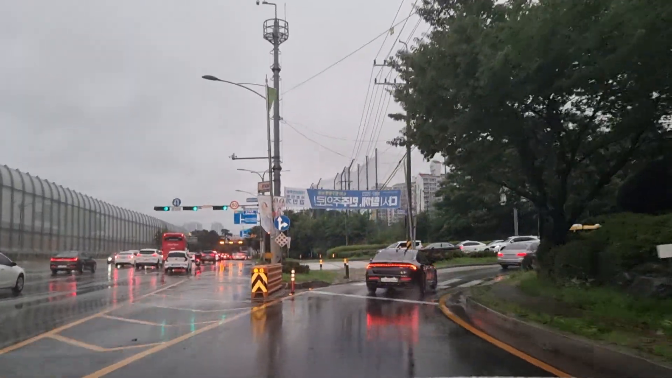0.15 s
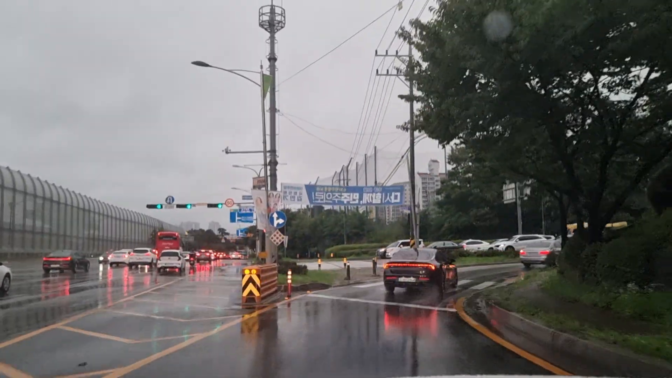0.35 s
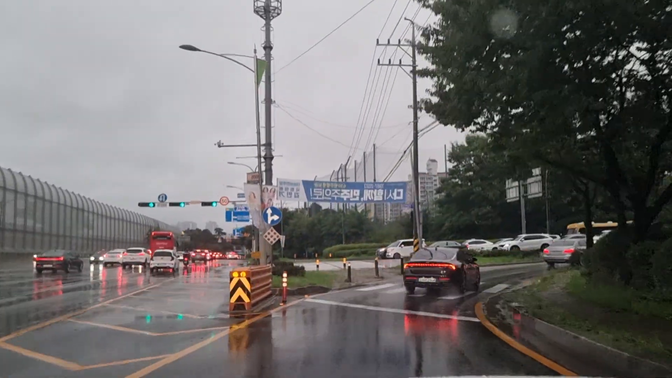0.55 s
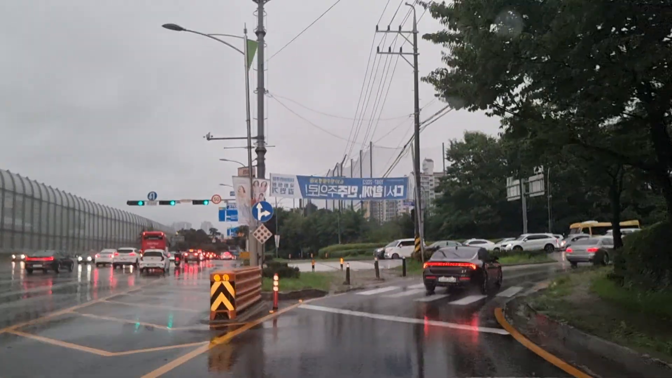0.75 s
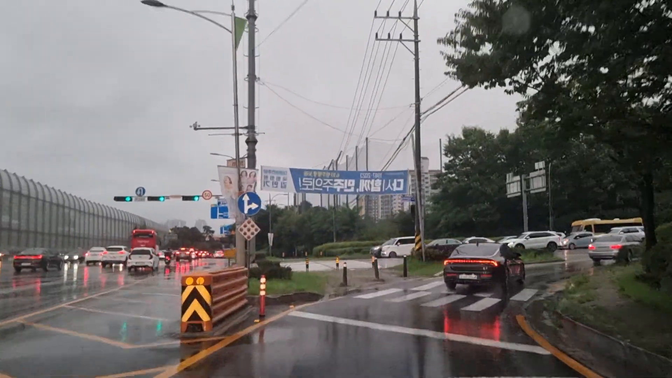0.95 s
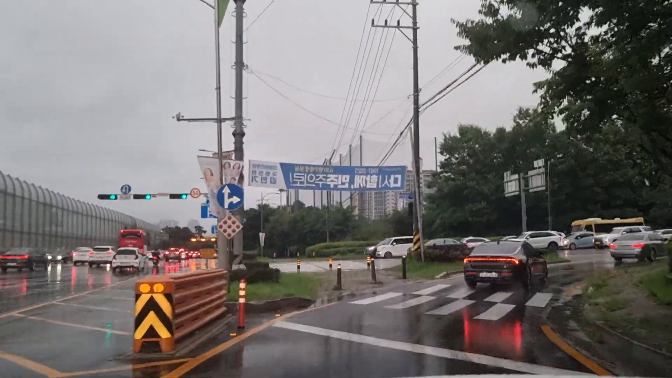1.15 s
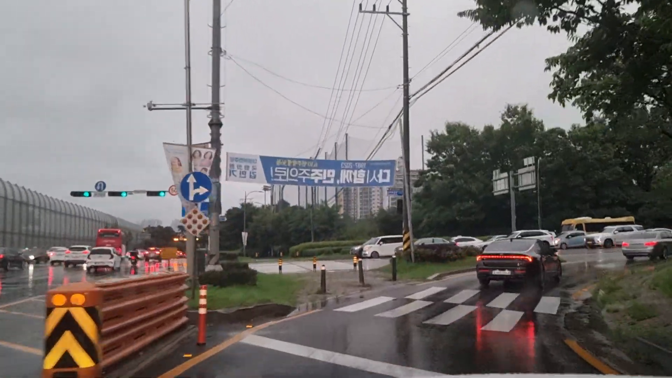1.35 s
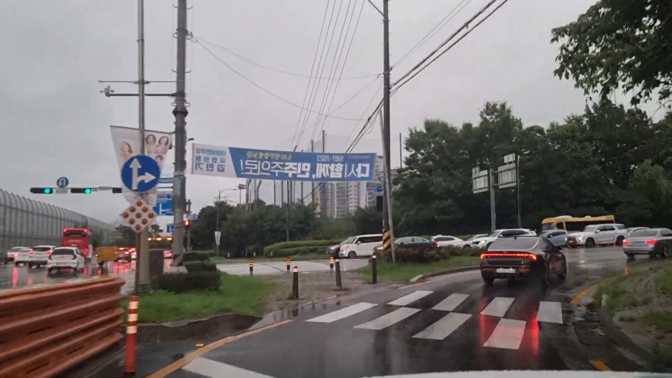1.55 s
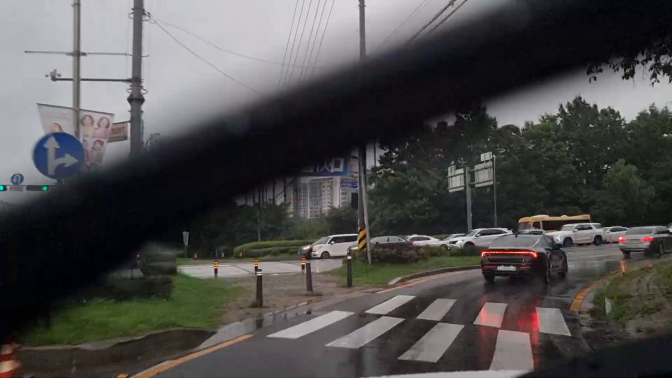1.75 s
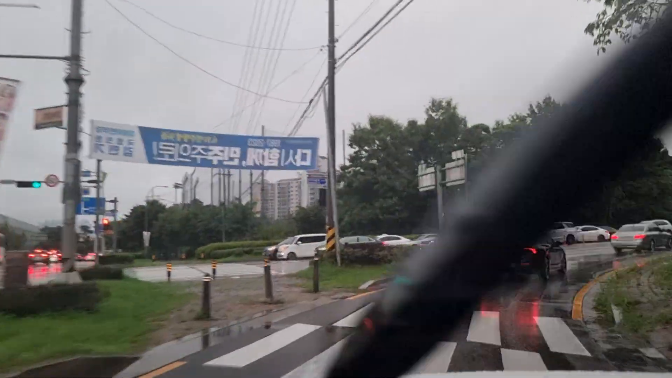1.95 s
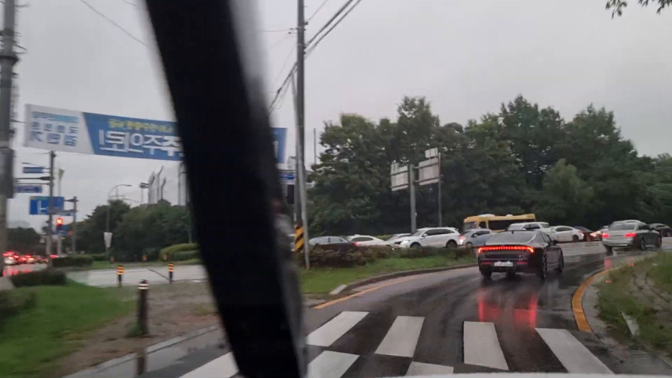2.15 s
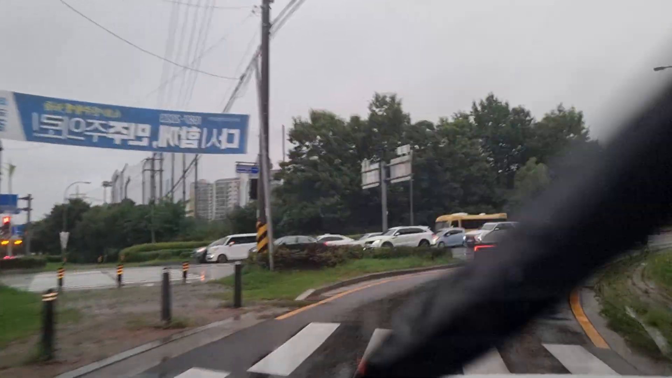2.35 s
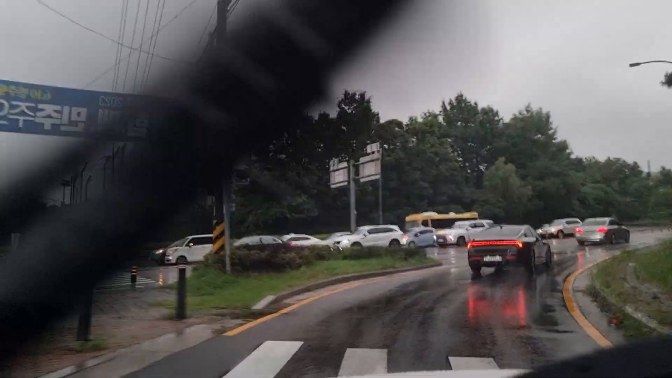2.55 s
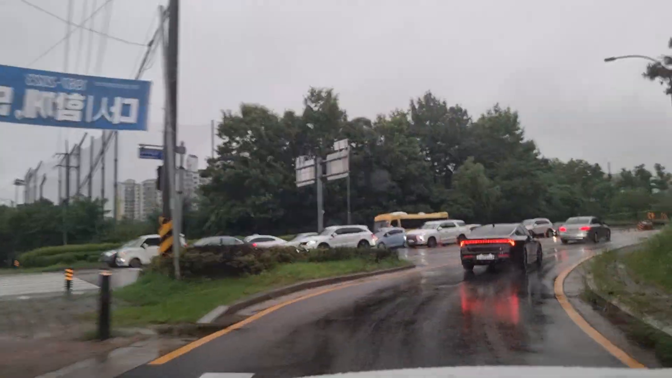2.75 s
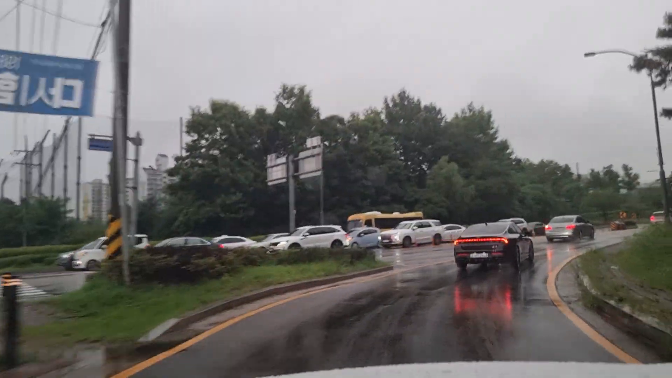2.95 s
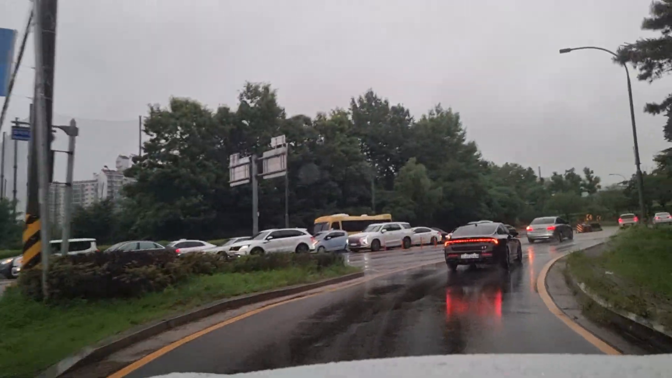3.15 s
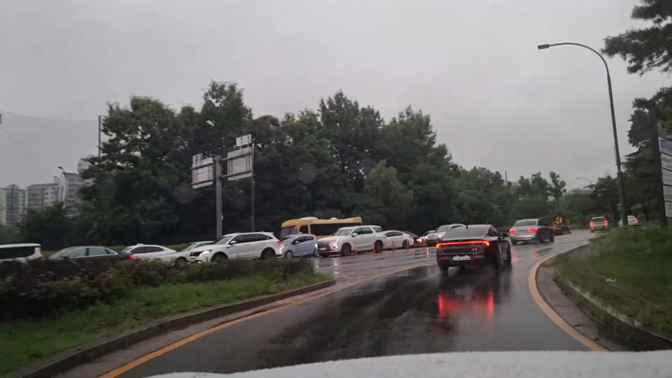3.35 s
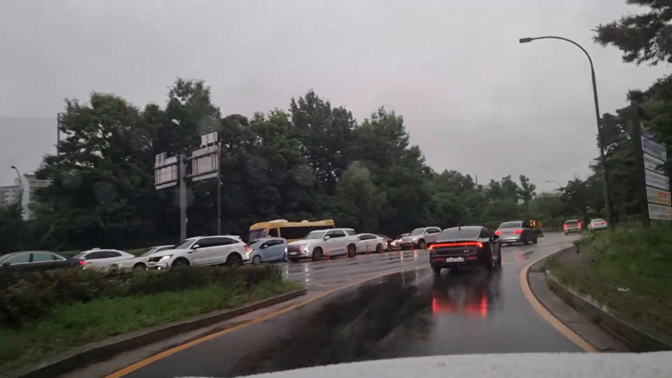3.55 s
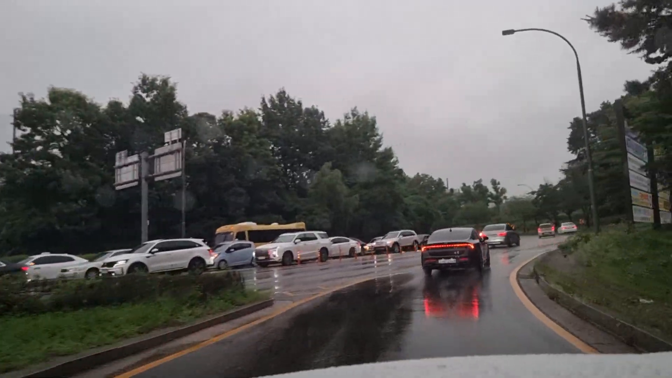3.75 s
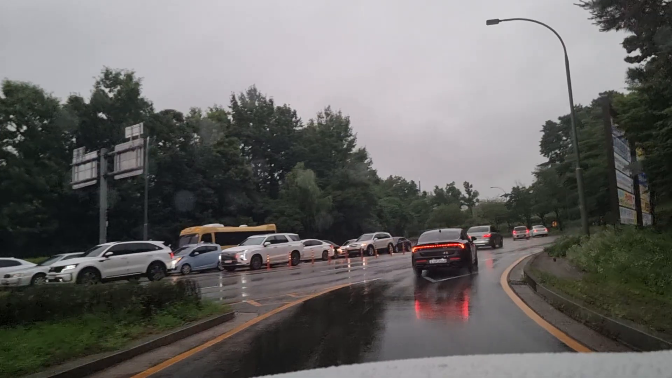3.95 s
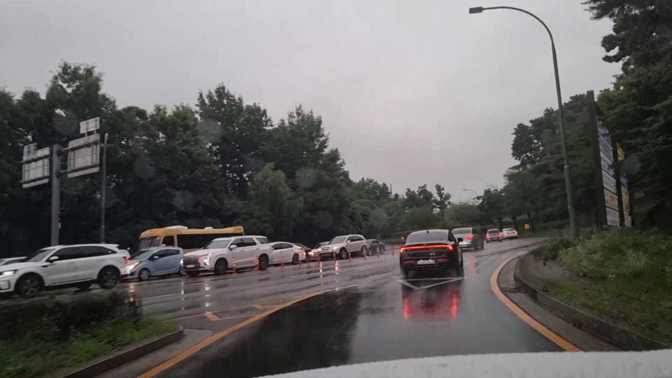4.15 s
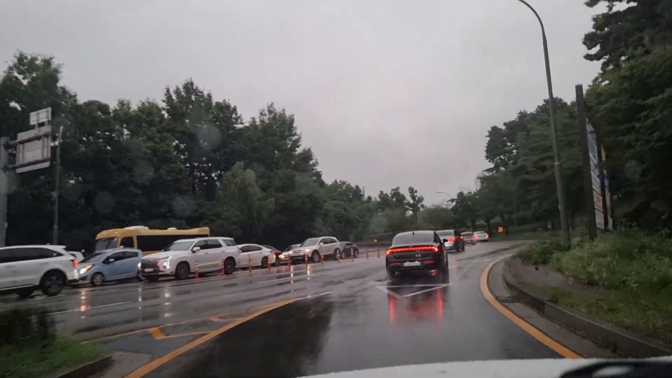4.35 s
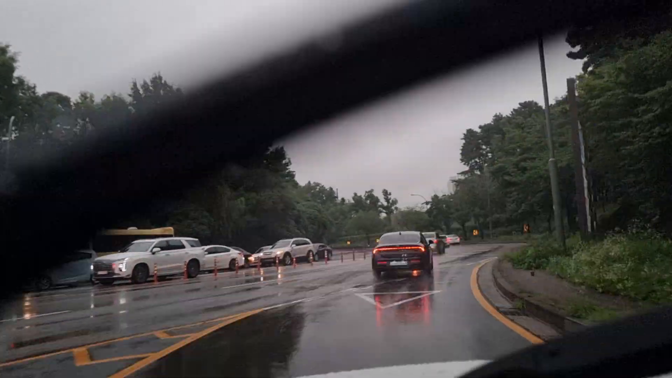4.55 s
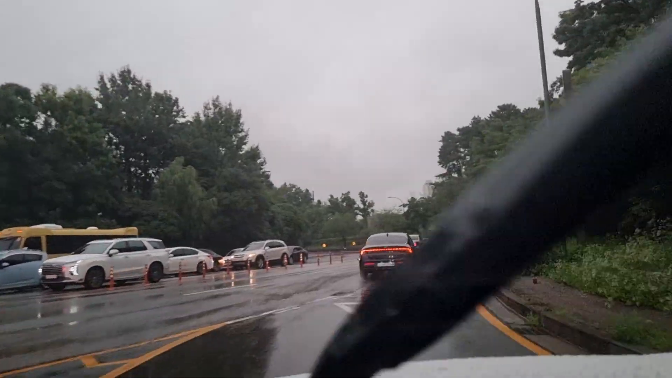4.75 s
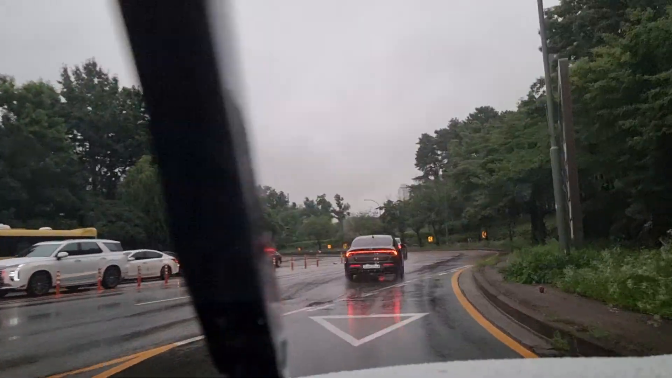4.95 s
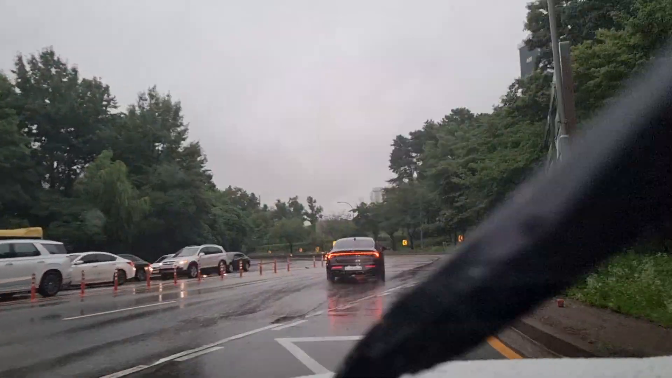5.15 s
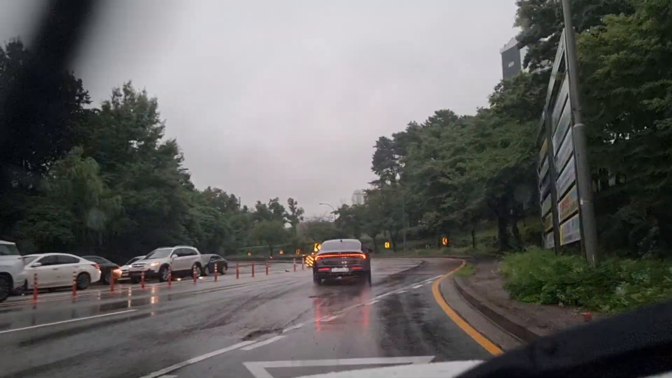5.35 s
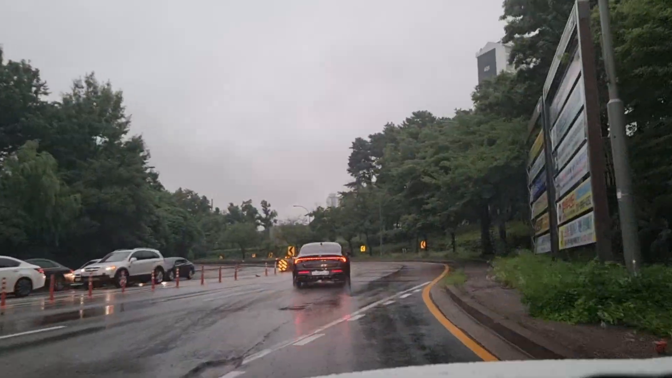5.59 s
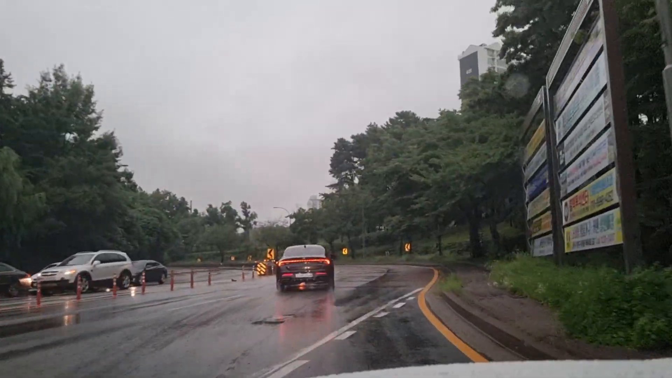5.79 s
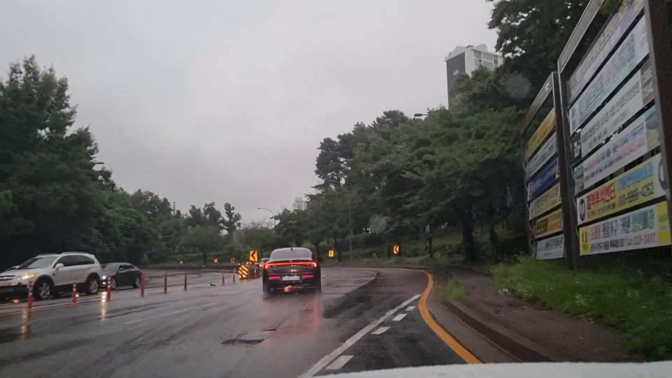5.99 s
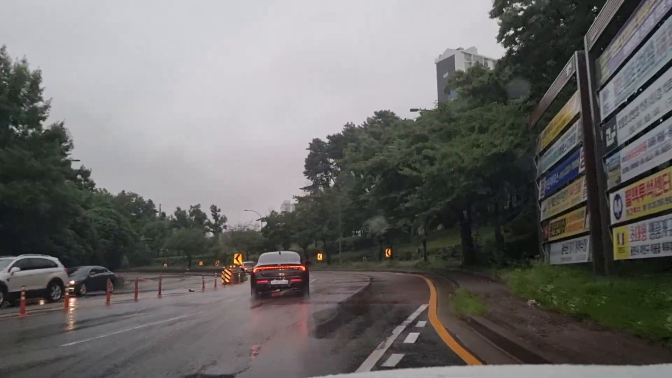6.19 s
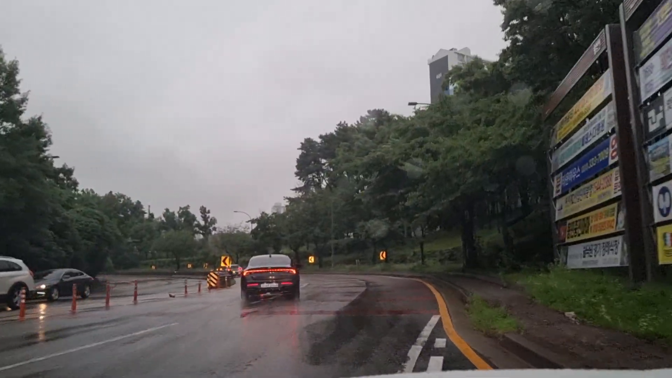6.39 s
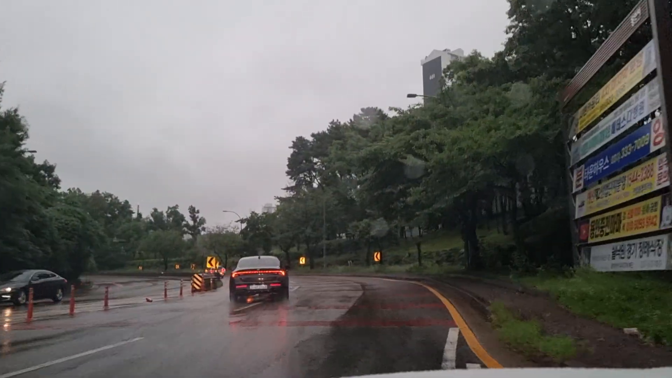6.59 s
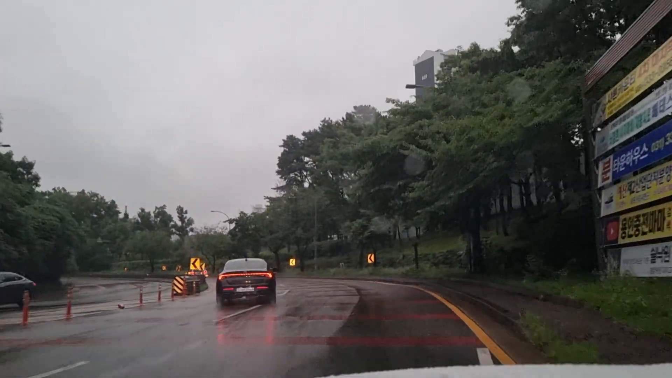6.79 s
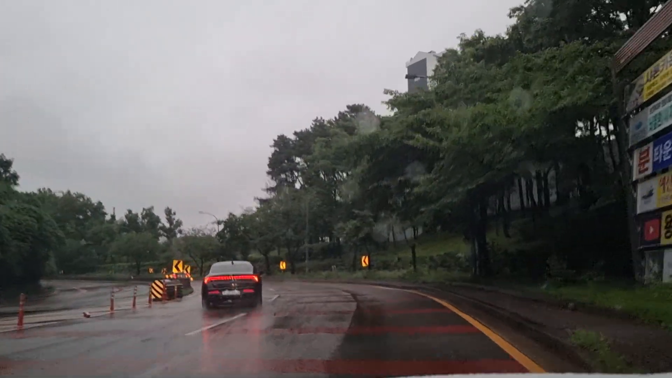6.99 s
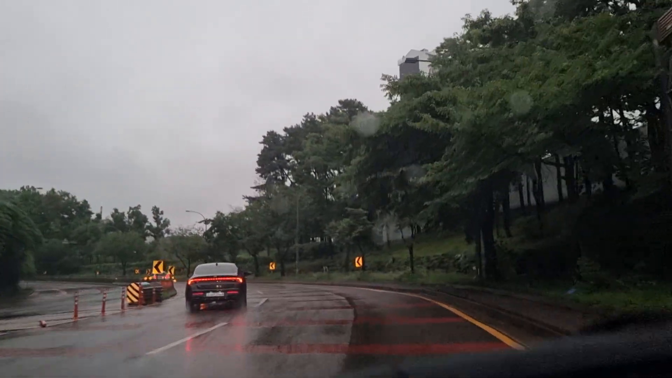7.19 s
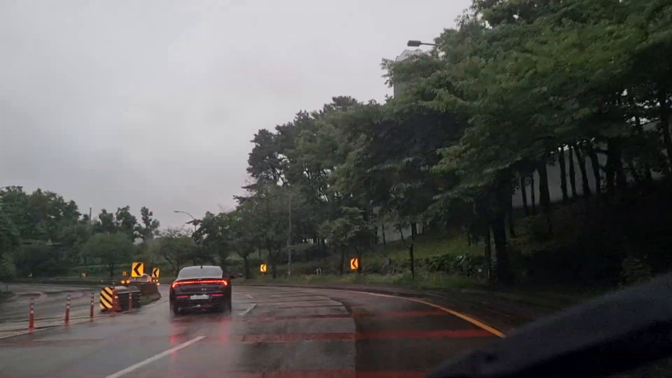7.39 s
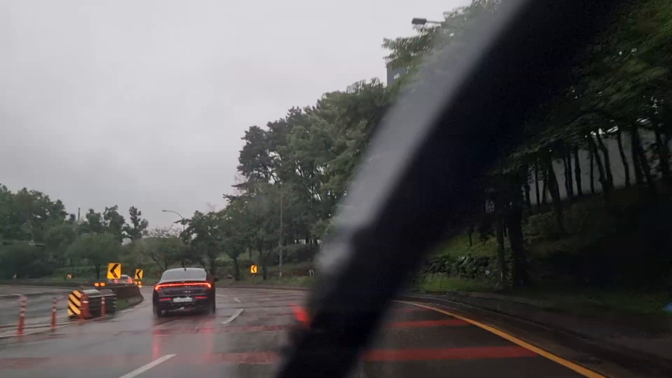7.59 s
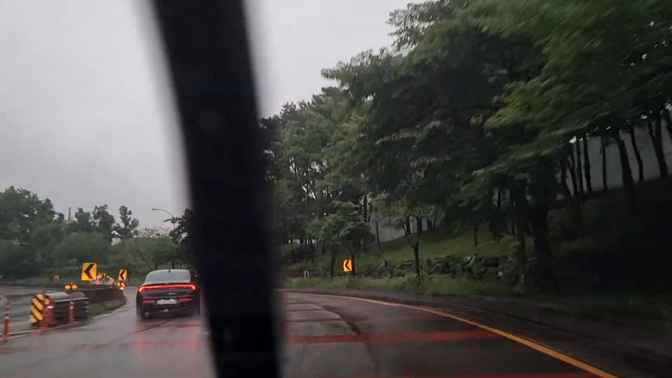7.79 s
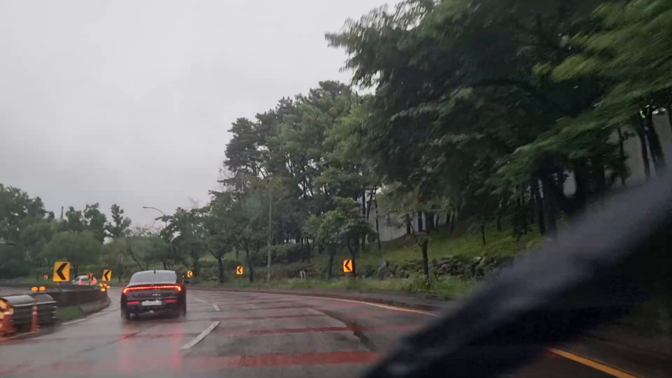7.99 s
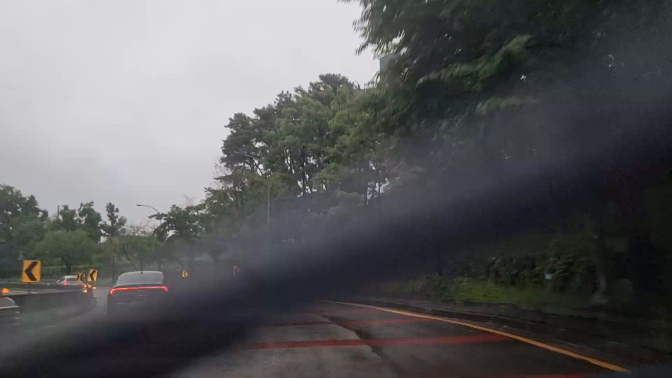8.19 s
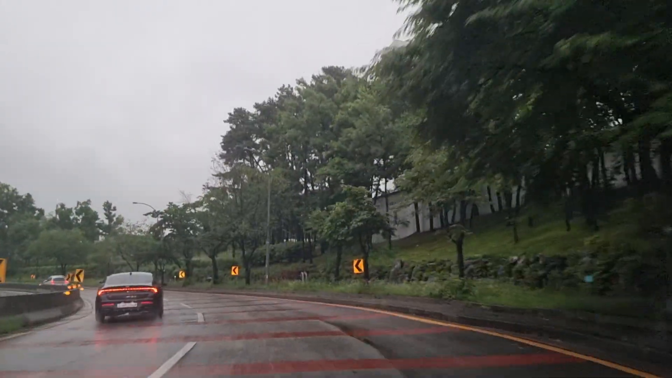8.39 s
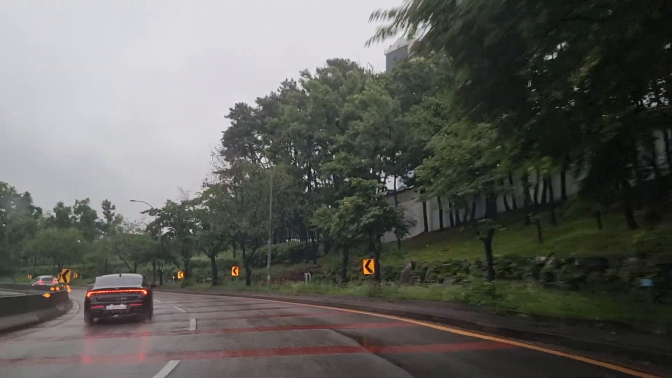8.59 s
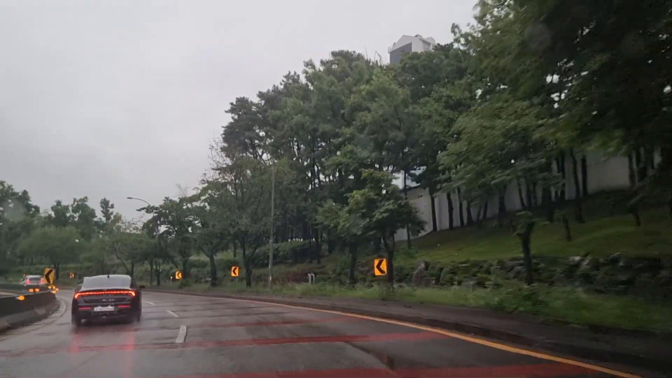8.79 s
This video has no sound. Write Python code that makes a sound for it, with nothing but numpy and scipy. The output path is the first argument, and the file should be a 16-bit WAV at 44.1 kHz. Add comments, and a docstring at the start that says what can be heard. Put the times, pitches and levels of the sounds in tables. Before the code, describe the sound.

Tyres rumble and an engine hums low, heard from the dashboard of a car rounding a wet bend. About every three seconds the windscreen wipers knock, flip over with a dull thump and settle softly, with occasional faint chirps. Single raindrops and brief flurries tap the glass. The engine eases, then picks up a little, and towards the end come soft road bumps and a faint, thin hiss.

```python
"""A low engine hum and the boom of tyres, heard from the dashboard of a car rolling round a wet slip road.
Water hisses under the tread. Close to the microphones the wipers scuff to rest, then make three sweeps:
a knock from the linkage, a thump as the blades flip over, a soft parking scuff, here and there a squeak.
Single raindrops and short flurries hit the glass and roof; late in the bend a thin hiss comes and goes."""
import sys
import numpy as np
from scipy import signal
from scipy.fft import rfft, irfft, next_fast_len
from scipy.io import wavfile
from scipy.ndimage import map_coordinates

SR = 44100
rng = np.random.default_rng(int(sys.argv[2]) if len(sys.argv) > 2 else 0)


def digitize_waveform(pressure):
    """Quantize a signal to 16-bit integers and store it at the path in sys.argv[1].

    Rows of a 2-D input are taken as channels; values are limited to [-1, 1].
    """
    field = np.atleast_2d(pressure).T
    bounded = np.clip(field, -1, 1)
    quanta = np.round(bounded * 32767).astype(np.int16)
    wavfile.write(sys.argv[1], SR, quanta)


N = 389403

BASS_LEFT_DB = 2.4  # hum and body shake lean to the left microphone
# Three noise colours. Each row: frequency in Hz, relative level in dB.
RUBBER = [(3000, -18), (6000, -3), (8500, -3), (10300, -5.5), (12500, 1), (15500, -1)]  # the thin hiss of rubber on glass
DROP = [(700, -21.5), (1500, 10.5), (2200, -8.5), (3000, 7.5), (4000, -5.5), (6000, -5.5), (8500, -16),
        (15500, -27)]  # the tick of one drop
SPRAY = [(2000, -19), (3000, 6.5), (4000, -0.5), (5200, -6), (8000, -15.5), (15500, -24)]  # the splash of small drops


def amp(db):
    """Decibels to gain."""
    return 10 ** (np.asarray(db) / 20)


def unit(x):
    """Scale to rms 1."""
    return x / np.sqrt(np.mean(x ** 2) + 1e-20)


def curves(rows):
    """One value per sample for each column after the time."""
    times, *columns = np.transpose(rows)
    return [np.interp(np.arange(N) / SR, times, column) for column in columns]


def wobble(rate):
    """A smooth random curve, rate knots a second."""
    knots = rng.standard_normal(int(N * rate / SR) + 4)
    return map_coordinates(knots, [np.arange(N) * rate / SR])


def swells(rows, attack, release):
    """Gain of (start, length, dB) events: up 20 dB per attack seconds, held, down 20 dB per release."""
    t = np.arange(N) / SR
    gains = []
    for start, length, db in rows:
        outside = np.maximum((start - t) / attack, (t - start - length) / release)
        gains.append(amp(db - 20 * np.maximum(outside, 0)))
    return np.max(gains, axis=0)


def peaks_db(rows, hz):
    """Lift in dB of (centre, width, dB) resonances at a frequency."""
    return sum(db / (1 + (2 * (hz - centre) / width) ** 2) for centre, width, db in rows)


def filtered(x, response):
    """Shape x by a gain that depends on frequency."""
    n = x.shape[-1]
    padded = next_fast_len(n + 8192)
    return irfft(rfft(x, padded) * response(np.fft.rfftfreq(padded, 1 / SR)), padded)[..., :n]


def noise(spectrum, size=N):
    """Noise of rms 1 with the colour of the (Hz, dB) points, rolled off below the first."""
    points_hz, db = np.transpose(spectrum)

    def colour(hz):
        low_cut = np.minimum(hz / points_hz[0], 1) ** 2
        return amp(np.interp(np.log(hz + 1), np.log(points_hz), db)) * low_cut
    return unit(filtered(rng.standard_normal(size), colour))


def stereo(mid, side, left_db):
    """Left and right from mid and side, the left louder by left_db."""
    return np.array([(mid + side) * amp(left_db / 2), (mid - side) * amp(-left_db / 2)])


def burst(spectrum, rise, t60, side_db, left_db):
    """A puff of coloured noise that swells and dies away."""
    t = np.arange(SR // 4) / SR
    shape = np.minimum(t / rise, 1) ** 2 * amp(-60 * np.maximum(t - rise, 0) / t60)
    mid, side = noise(spectrum, len(t)), amp(side_db) * noise(spectrum, len(t))
    return shape * unit(stereo(mid, side, left_db))


def add(track, start, sound):
    """Mix a sound in at start seconds; sounds that start before zero are left out."""
    if start >= 0:
        part = track[:, round(start * SR):][:, :sound.shape[1]]
        part += sound[:, :part.shape[1]]


def engine():
    """Firing orders come through the bulkhead, wavering, and boom where they meet a cabin resonance."""
    # Down towards idle, then up for the bend. Each row: time in seconds, firing rate in Hz, level in dB.
    revs = [(0, 47.45, -21), (.5, 45.18, -29), (1.1, 42.39, -26), (2.2, 38.59, -27), (2.85, 38.64, -22),
            (3.1, 46.34, -30), (3.55, 48.7, -34.5), (3.95, 55.1, -25), (4.6, 51.46, -31),
            (5.45, 54.63, -22.5), (6.25, 53.53, -32), (6.65, 55.47, -22.5), (8.83, 55.5, -29.5)]
    # Relative level in dB of the first four multiples of the firing rate.
    orders = [-2, -8, -22.5, -24]
    # Low cabin resonances. Each row: centre in Hz, width in Hz, lift in dB.
    booms = [(83.6, 12, 8), (159.5, 15, 7)]
    firing_hz, hum_db = curves(revs)
    phase = 2 * np.pi * np.cumsum(firing_hz * (1 + .0037 * wobble(12))) / SR
    hum = np.zeros(N)
    for order, order_db in enumerate(orders, 1):
        level = amp(hum_db + order_db + peaks_db(booms, order * firing_hz) + 1.5 * wobble(3.4))
        hum += level * np.sqrt(2) * np.sin(order * phase + rng.uniform(0, 2 * np.pi))
    return stereo(hum, 0, BASS_LEFT_DB)


def tyres():
    """Under the floor, uneven asphalt shakes the body and roars into the cabin; the water film hisses."""
    # The car gathers speed and the road coarsens.
    # Each row: time in seconds, then roar, wet hiss and body shake in dB.
    road = [(0, -27.5, -62, -40), (1.6, -28, -59.5, -39.5), (3.4, -27, -62.5, -32.5),
            (6.2, -26.5, -64, -33.5), (6.9, -24.5, -63, -32.5), (7.8, -25, -61.5, -35.5),
            (8.83, -25.3, -62, -39)]
    # Uneven patches. Each row: start in seconds, length in seconds, shake in dB.
    bumps = [(1.45, 0.13, -22.5), (3.08, 0.042, -24), (6.42, 0.14, -24), (6.7, 0.34, -21),
             (7.28, 0.24, -21), (8.22, .12, -24)]
    # Cabin resonances. Each row: centre in Hz, width in Hz, lift in dB.
    cabin_modes = [(82, 20, 3), (259, 18, 4), (346, 120, 2.5), (546, 26, 9.5), (600, 23, 7), (791, 37, 5),
                   (987, 35, 5), (1810, 200, 3)]
    # Four noise colours. Each row: frequency in Hz, relative level in dB.
    sprung_body = [(15, -19), (25, -5), (42, 0), (52, -2), (65, -14), (120, -45), (400, -120)]
    roar_mid = [(35, -66.5), (60, -3.5), (92, 2), (130, -12.5), (156, -11), (248, -16), (285, -24),
                (333, -18.5), (407, -28.5), (545, -34.5), (677, -39), (980, -44.5), (1180, -51.5),
                (1490, -51.5), (2400, -59.5), (3120, -115.5), (5280, -120)]  # alike at both microphones
    roar_side = [(35, -46.5), (60, -2.5), (91, 7.5), (111, -10), (130, -13.5), (151, -2), (182, -22),
                 (237, -10), (318, -10.5), (475, -19), (554, -19), (840, -22.5), (951, -23), (1040, -24),
                 (2400, -54.5), (3120, -82), (5280, -120)]  # opposed between them
    water_film = [(1400, 2.5), (2200, -5), (2850, 1.5), (3500, -1), (4600, -9.5), (7000, -13), (8500, -25),
                  (11000, -32), (15500, -33.5)]
    roar_db, wet_db, shake_db = curves(road)
    asphalt_db = .7 * wobble(7)
    shake_gain = np.hypot(amp(shake_db), swells(bumps, attack=.15, release=.25))
    shake = shake_gain * stereo(noise(sprung_body), 0, BASS_LEFT_DB)
    roar = stereo(noise(roar_mid), amp(-8) * noise(roar_side), left_db=3)
    roar = filtered(roar, lambda hz: amp(peaks_db(cabin_modes, hz)))
    hiss = stereo(noise(water_film), amp(1) * noise(water_film), left_db=3)
    return shake + amp(roar_db + asphalt_db) * roar + amp(wet_db + asphalt_db / 2) * hiss


def thud():
    """A soft blow of the wiper arm rings the windscreen, close by and to the left."""
    # Modes of screen and cowl. Each row: frequency in Hz, level in dB, seconds to fall 60 dB.
    screen_modes = [(84, -20, .3), (124, -10, .066), (152, 0, .032), (248, -18, .085), (360, -26, .05)]
    t = np.arange(SR // 4) / SR
    ring = -sum(amp(db + rng.normal(0, 1) - 60 * t / t60) * np.sin(2 * np.pi * hz * t)
                for hz, db, t60 in screen_modes)
    ring *= (1 - np.exp(-t / .0046)) ** 2  # soft onset
    return stereo(ring / np.abs(ring).max(), 0, left_db=7)


def wipers(thump_db=-5.5, park_db=-54.5, park_after_s=.594):
    """Just beyond the glass the linkage takes up its play, the blades flip in turn, then park."""
    # Each row: time of the turn in seconds, slap in dB, click in dB. Of the first, only parking is heard.
    sweeps = [(-.494, -23, -42), (2.3132, -23.5, -42), (5.1074, -22, -43.5), (7.9121, -21.5, -45)]
    # Play in the linkage. Each row: seconds before the turn, click in dB, knock in dB.
    play = [(.723, -48, -18), (.699, -57, -18), (.1, -49.5, -36)]
    # Near blade, far blade, rebound of the arms. Each row: seconds after the turn, relative level in dB.
    blows = [(0, 0), (.0142, -6), (.038, -10)]
    # Colours of blade slap and linkage click. Each row: frequency in Hz, relative level in dB.
    slap = [(200, -21.5), (400, 6.5), (570, 14.5), (850, -3), (1250, -2.5), (1900, -14), (2500, -29.5),
            (4000, -41), (15000, -45)]
    linkage = [(1200, -3), (2900, 1.5), (4200, -8.5), (6000, -7.5), (7400, -2), (9300, -8.5),
               (11000, -23.5), (15500, -30)]
    out = np.zeros((2, N))
    for turn, slap_db, click_db in sweeps:
        for lead, play_db, knock_db in play:
            click = burst(linkage, rise=.0062, t60=.064, side_db=1.5, left_db=1.5)
            knock = thud() + amp(-15.5) * burst(slap, rise=.007, t60=.14, side_db=6, left_db=-2)
            add(out, turn - lead - .002, amp(play_db) * click)
            add(out, turn - lead, amp(knock_db) * knock)
        lip_unsticking = burst(DROP, rise=.003, t60=.021, side_db=-10, left_db=6)
        add(out, turn - .01, amp(click_db - 5) * lip_unsticking)
        for lag, db in blows:
            add(out, turn + lag, amp(thump_db + db) * thud())
        add(out, turn - .006, amp(slap_db) * burst(slap, rise=.008, t60=.13, side_db=7, left_db=0))
        add(out, turn + .002, amp(click_db) * burst(linkage, rise=.004, t60=.08, side_db=-1, left_db=4))
        scuff = burst(RUBBER, rise=.012, t60=.16, side_db=0, left_db=-2)
        soft_slap = amp(8) * burst(slap, rise=.015, t60=.17, side_db=5, left_db=.5)
        add(out, turn + park_after_s, amp(park_db) * (scuff + soft_slap))
    return out


def rain(light_per_s=1.5, light_db=-48, spread_db=1.5, edge_hz=2300):
    """Single drops tick and splash on the glass and roof; the light ones fall at random."""
    # Heavy drops. Each row: start in seconds, level in dB.
    heavy = [(.148, -43), (1.262, -46.5), (1.486, -48), (1.794, -42.5), (2.7008, -30), (3.461, -39.5),
             (3.518, -44.5), (3.7327, -45.5), (4.31, -42.5), (4.5467, -43.5), (4.7018, -43),
             (5.3342, -45.5), (5.544, -43), (6.149, -45.5), (6.266, -46.5)]
    out = np.zeros((2, N))
    chance = rng.random((round(light_per_s * N / SR), 2))
    light = [(when * N / SR, light_db + spread_db * (1 - 2 * softness)) for when, softness in chance]
    for start, db in heavy + light:
        tick = burst(DROP, rise=.0012, t60=.022, side_db=-1, left_db=3)
        splash = amp(-13) * burst(SPRAY, rise=.006, t60=.08, side_db=1.5, left_db=1)
        low_edge = edge_hz * amp(-(db + 43) / 2)  # a heavier drop sounds lower and fuller
        drop = filtered(tick + splash, lambda hz: hz ** 4 / (hz ** 4 + low_edge ** 4))
        add(out, start, amp(db) * drop)
    return out


def spatter(drops_per_s=330, spread_db=1.8, t60=.023):
    """Flurries of small drops crackle across the glass."""
    # Each row: start in seconds, length in seconds, level in dB.
    flurries = [(1.47, .03, -66), (4.55, .05, -67), (5.545, .115, -62.5), (5.79, .22, -63.5),
                (7.365, .08, -62.5)]
    hits = rng.random(N) < drops_per_s / SR
    sizes = hits * amp(spread_db * rng.standard_normal(N)) * swells(flurries, attack=.015, release=.095)
    decay = amp(-60 * np.arange(SR // 10) / SR / t60)
    patter = signal.fftconvolve(sizes, decay)[:N]
    return patter * stereo(noise(SPRAY), noise(SPRAY), left_db=.5)


def squeaks(octave_db=-10.5, sag_per_s=2.3):
    """Off to the left the blades stick and slip in brief chirps, unsteady and sagging in pitch."""
    # Each row: start in seconds, pitch in Hz, level in dB, length in seconds.
    catches = [(1.602, 2900, -50.5, 0.032), (1.654, 2790, -48, 0.021), (4.997, 2730, -55, 0.033),
               (7.392, 3289, -57, 0.04), (7.61, 4730, -64, 0.065)]
    out = np.zeros((2, N))
    for start, hz, db, length in catches:
        t = np.arange(round(length * SR)) / SR
        unsteady = .04 * map_coordinates(rng.standard_normal(100), [700 * t])
        pitch = hz * (1 + unsteady - sag_per_s * (t - length / 2))
        phase = 2 * np.pi * np.cumsum(pitch) / SR
        chirp = np.sin(np.pi * t / length) * (np.sin(phase) + amp(octave_db) * np.sin(2 * phase))
        add(out, start, stereo(amp(db) * chirp, 0, left_db=8))
    return out


def high_hiss():
    """Late in the bend a thin, fluttering hiss swells and fades, wide between the microphones."""
    # Each row: start in seconds, length in seconds, level in dB.
    hisses = [(6.4, 0.58, -79.5), (7.11, 0.074, -69), (7.375, 0.054, -68.5), (7.62, 0.31, -61.5),
              (7.95, 0.25, -68), (8.5, 0.17, -65.5)]
    level = swells(hisses, attack=.11, release=.11) * amp(.8 * wobble(43))
    return level * stereo(noise(RUBBER), noise(RUBBER), left_db=2)


def cabin(x, wet_db=-7, t60=.069):
    """Nearby glass and trim throw back a short, dense echo of the middle and high tones."""
    t = np.arange(SR // 8) / SR
    tail = rng.standard_normal((2, len(t))) * amp(-60 * t / t60) * (t > .001)
    tail /= np.linalg.norm(tail, axis=1, keepdims=True)
    tail = filtered(tail, lambda hz: hz ** 2 / (hz ** 2 + 900 ** 2))
    return x + amp(wet_db) * signal.fftconvolve(x, tail, axes=1)[:, :N]


def scene():
    """Everything as it reaches the stereo pair at the dashboard."""
    return cabin(engine() + tyres() + wipers() + squeaks() + high_hiss() + spatter() + rain())


def record(dry, top_hz=15850):
    """The recorder rounds off full-scale peaks, eases in and out, and cuts the highest treble."""
    rounded = dry / (1 + np.abs(dry) ** 12) ** (1 / 12)
    eased = rounded * signal.windows.tukey(N, .001)
    return signal.sosfilt(signal.ellip(12, .1, 80, top_hz, fs=SR, output="sos"), eased)


dry = scene()
out = record(dry)
digitize_waveform(out)
```